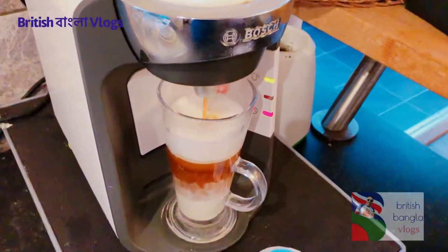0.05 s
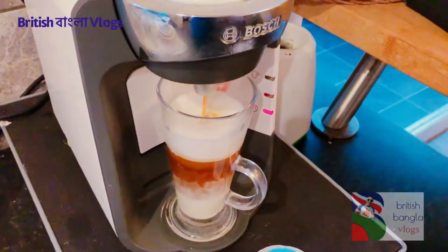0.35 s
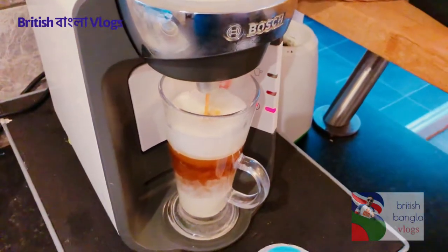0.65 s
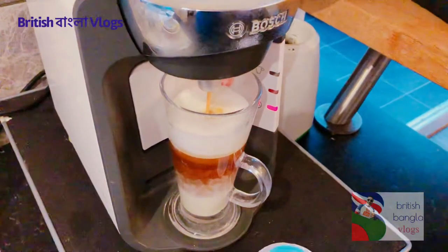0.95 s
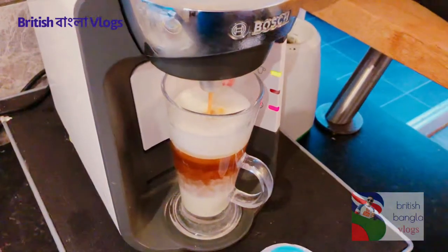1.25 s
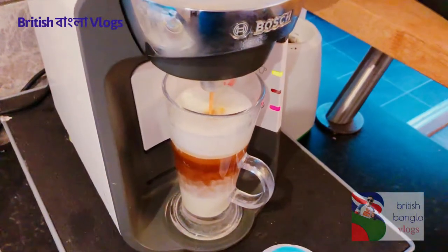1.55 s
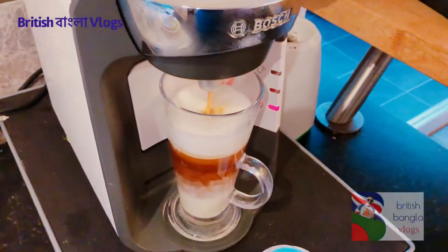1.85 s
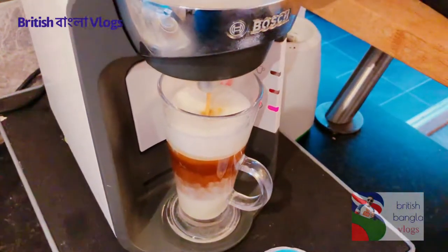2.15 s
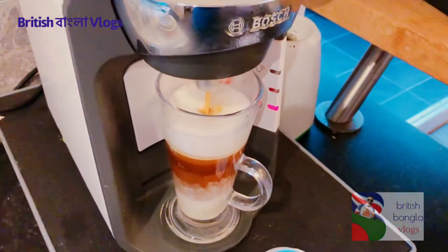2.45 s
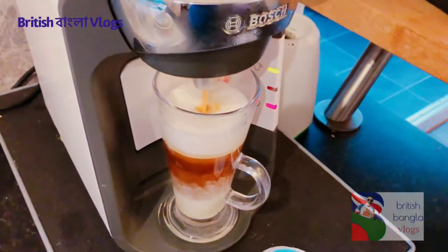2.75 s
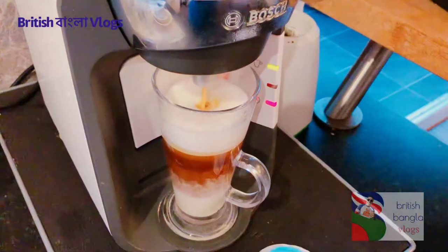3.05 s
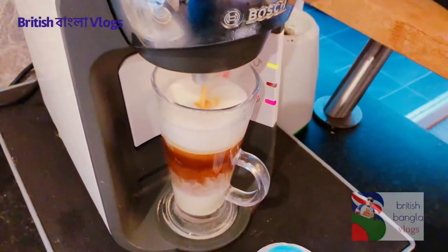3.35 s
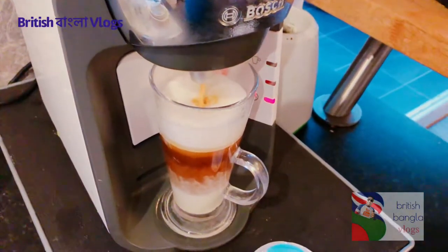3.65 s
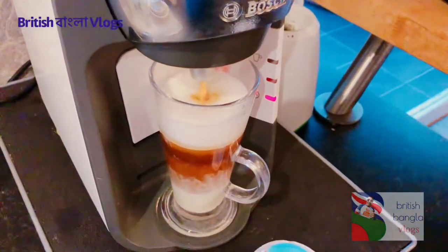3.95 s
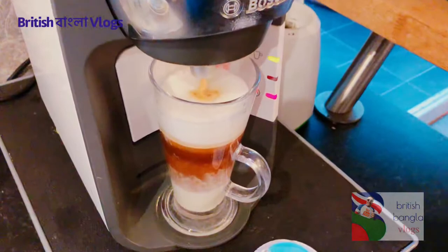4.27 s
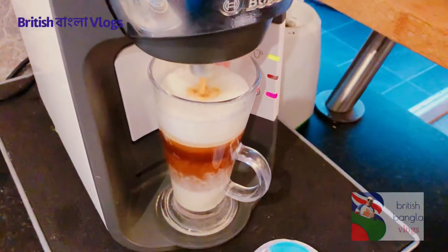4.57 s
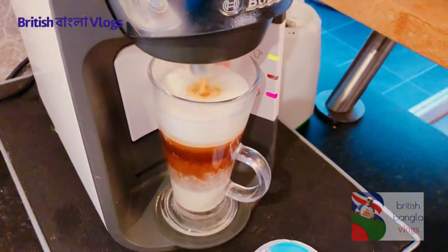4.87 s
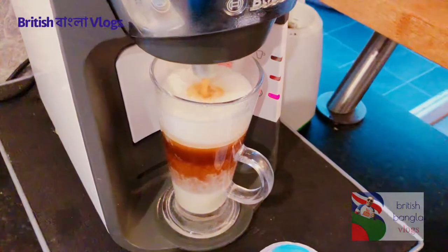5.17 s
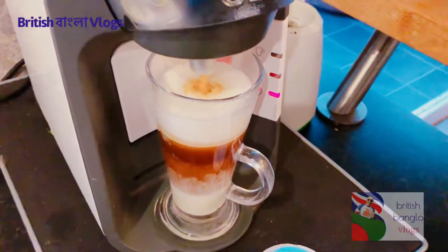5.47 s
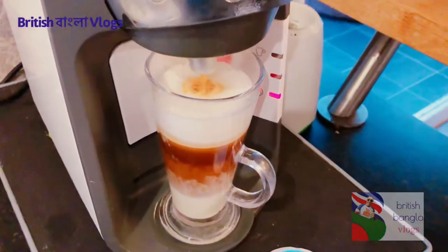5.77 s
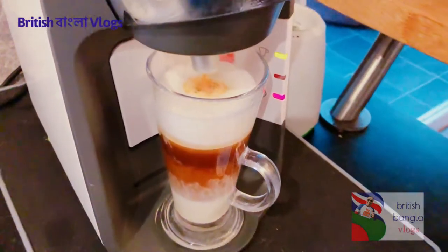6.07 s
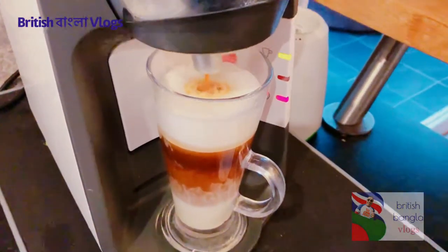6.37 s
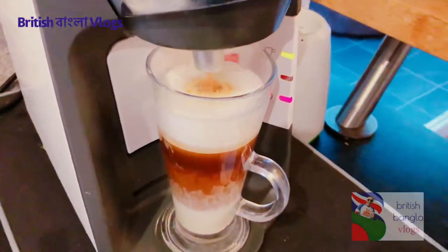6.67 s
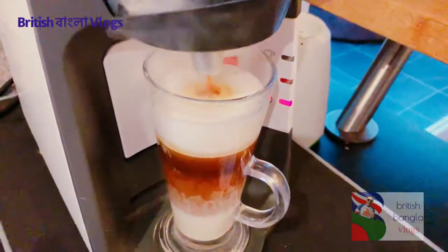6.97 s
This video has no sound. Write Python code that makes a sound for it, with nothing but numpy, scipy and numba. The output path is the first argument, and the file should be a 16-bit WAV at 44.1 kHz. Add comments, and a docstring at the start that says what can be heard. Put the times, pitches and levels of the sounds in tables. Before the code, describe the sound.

Close to the microphone in a small kitchen, steam hisses from the spout of a pod coffee machine, surging and spitting with quick wet pops. After about three seconds the spitting stops and hollow bubbles begin to gulp through the pod, growing louder and denser into a steady gurgle. Froth crackles and thin, high jets sizzle over it toward the end, with a faint electrical hum behind.

```python
"""Steam hisses and spits from the spout of a pod coffee machine, close to a phone in a small kitchen.
Liquid chokes the steam, which tears through in surges. After about three seconds bubbles start to gulp
through the pod and ring its cavity, ever wetter and denser, while froth crackles and fine jets sizzle
in the nozzle. Worktop and walls add a short tail; a faint mains hum lies behind it all."""
import sys
import numpy as np
from scipy import signal
from scipy.fft import rfft, irfft
from scipy.io import wavfile
from scipy.ndimage import uniform_filter1d
from numba import njit

SR = 44100
rng = np.random.default_rng(int(sys.argv[2]) if len(sys.argv) > 2 else 0)


def wav_record(signal):
    """Record a signal, one row per channel, as 16-bit PCM in the file named by sys.argv[1]."""
    frames = np.transpose(np.atleast_2d(signal))
    bounded = np.clip(frames, -1, 1)
    # unit amplitude maps onto the largest positive 16-bit level
    quanta = np.round(bounded * 32767).astype(np.int16)
    wavfile.write(sys.argv[1], SR, quanta)


N = 318402
TIME = np.arange(N) / SR

# Steam pressure behind the spout. Each row: time in seconds, hiss level in dB.
STEAM_LEVEL = [(0, -46.5), (.68, -48.5), (.84, -50), (1.1, -48), (1.4, -49), (2.06, -48), (2.2, -46),
               (2.45, -49.5), (2.85, -49.5), (3.25, -52), (3.6, -51.5), (4.4, -49.5), (5.9, -50.5),
               (6.6, -53.5), (7.22, -54.5)]
# The hiss from close by. Each row: frequency in Hz, level in dB.
STEAM_SPECTRUM = [(100, -4.5), (400, -6), (600, 8.5), (950, -11.5), (1300, -23.5), (2000, -10.5),
                  (2550, -10), (3100, -2), (3550, -1.5), (3900, -2), (4200, -2.5), (4850, -1), (5400, 0),
                  (6500, 2.5), (7700, -4.5), (8800, -9.5), (12000, -17.5)]
# Narrow resonances of the spout. Each row: frequency in Hz, width in Hz, level in dB.
SPOUT_MODES = [(3030, 70, 1), (3420, 120, 2), (3660, 70, 0), (4160, 80, 6.5), (4320, 60, 4), (5180, 55, 2),
               (5430, 60, 4), (5630, 60, -1), (5805, 95, 3), (6150, 55, 0), (6365, 50, 4), (6620, 180, 2.5),
               (7165, 80, 5), (7650, 80, 1), (7980, 90, 3), (8320, 70, 3)]
def steam(level_db=2, flutter_db=2, swell_db=1, droplet_db=-10, split_hz=5400, damped_hz=4750):
    """Turbulent hiss with fine droplets rings the spout; large and small eddies flutter apart."""
    db, = curves(STEAM_LEVEL)
    surge_hiss = undb(-5) * np.minimum(surge(), undb(-49))
    force = np.hypot(undb(db) * throttle(), surge_hiss)
    jet = 0
    for side in ("low", "high"):
        eddies = unit(noise() + undb(droplet_db) * pops(rate=900, spread_db=14))
        unsteady = undb(flutter_db * flutter() + swell_db * walk(24.96))
        jet = jet + butter(eddies * unsteady, split_hz, side, order=4)
    hiss = colour(jet * force * undb(level_db), STEAM_SPECTRUM, SPOUT_MODES)
    # foam fills the spout and damps its middle resonances
    middle = signal.lfilter(*signal.iirpeak(damped_hz, 3, fs=SR), hiss)
    return hiss - np.interp(TIME, [4.9, 6.6], [0, .45]) * middle


# Liquid chokes the spout. Each row: clearing time in seconds, build-up in seconds, depth in dB.
SPOUT_CHOKES = [(.955, 0.34, 2.5), (1.135, 0.17, 7), (1.33, 0.12, 2), (1.57, 0.088, 3.5), (2.355, 0.36, 7),
                (3.85, 0.21, 4)]
def throttle(clear_s=.0033):
    """Share of the steam that gets past the liquid gathering in the spout."""
    return undb(-sum(depth * np.interp(TIME, [s - build, s, s + clear_s], [0, 1, 0])
                     for s, build, depth in SPOUT_CHOKES))


# Surges at the spout. Each row: start in seconds, end in seconds, level in dB.
STEAM_SURGES = [(0, 0.212, -46), (0.506, 0.625, -55.5), (1.183, 1.273, -50), (1.685, 1.7, -59.5),
                (1.923, 1.953, -54)]
def surge(attack_s=.092, release_s=.069):
    """Force of the steam as it tears through liquid."""
    return sum(undb(db) * gate(start, end, attack_s, release_s) for start, end, db in STEAM_SURGES)


# Single spits. Each row: time in seconds, plop level in dB, crack level in dB, length in seconds.
SPOUT_SPITS = [(0.016, -40.5, -50, 0.014), (0.1, -39, -40, 0.016), (0.134, -36, -40.5, 0.01),
               (0.16, -37, -52, 0.0059), (0.236, -39, -52, 0.004), (0.325, -45, -55, 0.0045),
               (0.37, -42, -52, 0.0058), (0.425, -37, -57, 0.012), (0.505, -37.5, -55, 0.0042),
               (0.573, -34.5, -41, 0.012), (0.606, -40.5, -42, 0.0051), (0.641, -40, -57, 0.0041),
               (0.681, -42, -54, 0.0056), (0.953, -68, -47, 0.028), (1.097, -48, -60, 0.004),
               (1.133, -45, -49, 0.0056), (1.169, -33.5, -37.5, 0.012), (1.21, -42, -37.5, 0.0086),
               (1.24, -49, -34, 0.005), (1.246, -33.5, -43, 0.0087), (1.414, -46, -41, 0.009),
               (1.466, -39.5, -45, 0.0078), (1.641, -47, -57, 0.0051), (1.674, -41.5, -43.5, 0.013),
               (1.725, -46, -40, 0.0074), (1.756, -41, -40, 0.008), (1.803, -39, -41, 0.008),
               (1.896, -35.5, -40, 0.017), (1.924, -43, -41, 0.013), (1.952, -46, -45, 0.005),
               (2.013, -43, -45, 0.0066), (2.025, -53, -43.5, 0.018), (2.171, -47, -56, 0.011),
               (2.21, -43, -46, 0.0064), (2.303, -49, -48, 0.005), (2.342, -45, -52, 0.0048),
               (2.36, -39.5, -45, 0.013), (2.424, -44.5, -47, 0.014), (2.523, -56, -48, .004),
               (2.563, -41, -44, 0.0077), (2.627, -43, -42, 0.005), (2.66, -42, -43, 0.01),
               (2.751, -43, -49, 0.0077), (2.798, -38.5, -43, 0.011), (2.83, -42, -43, 0.0092),
               (2.877, -45, -41, 0.0063), (2.903, -45, -40, 0.0046), (2.972, -48, -57, 0.0048),
               (3.108, -48, -41, 0.0044), (3.143, -41, -40, 0.0074), (3.165, -62, -40.5, 0.0089)]
# The wet body of a spit, then its crack. Each row: frequency in Hz, level in dB.
SPIT_SPECTRUM = [(80, -27), (160, -2.5), (260, -1), (420, 0.5), (590, 5.5), (740, -1.5), (850, 7),
                 (1000, -1), (1200, 7), (1380, 4), (1490, -11), (1620, -0.5), (1900, 0.5), (2700, -7.5),
                 (4000, -6), (7000, -26), (10000, -23.5), (16000, -34)]
CRACK_SPECTRUM = [(900, -44), (1800, 4), (4000, 4), (7000, 7.5), (9000, -7.5), (12500, -8), (16000, -23)]
POCKET_HZ, POCKET_SCATTER, POCKET_DRYING_DB_PER_S = 1325, .028, 2.6
def sputter(level_db=-2, lump_db=3, plop_db=-7, crack_db=-2, drying_db_per_s=.5):
    """Slugs of liquid burst into clusters of tiny pops; the largest are spits with a sharp crack."""
    spatter = undb(-60 - drying_db_per_s * TIME) * throttle() + surge()
    lumps = unit(undb(lump_db * flutter()))
    force = spatter * undb(level_db) * lumps * np.interp(TIME, [3.2, 3.5], [1, 0])
    snapping = unit(pops(rate=3000, spread_db=-5.5) + 1.15 * noise())
    burst = np.zeros(N)
    for s, low_db, high_db, length in SPOUT_SPITS:
        age = np.maximum(TIME - s + .0016, 0) / (length / 2)
        swell = age * np.exp(1 - age)
        force = force + undb(low_db + plop_db) * swell
        burst = burst + undb(high_db + crack_db) * swell
    tearing = unit(pops(rate=2700, spread_db=0) + .53 * noise())
    body = colour(force * tearing, SPIT_SPECTRUM)
    # air in the liquid rings, more weakly as the spout dries
    air = ring(force * noise(), POCKET_HZ * np.exp(POCKET_SCATTER * walk(11)), width_hz=100.)
    air *= undb(-14.5 - POCKET_DRYING_DB_PER_S * TIME)
    return body + air + colour(burst * snapping, CRACK_SPECTRUM, SPOUT_MODES)


def pockets(level_db=1, rise_s=.002):
    """Each spit traps a pocket of air that pings as it closes."""
    pitches = POCKET_HZ * np.exp(POCKET_SCATTER * rng.standard_normal(len(SPOUT_SPITS)))
    return blips([(s + length / 4, db + level_db - POCKET_DRYING_DB_PER_S * s, hz, rise_s)
                  for (s, db, _, length), hz in zip(SPOUT_SPITS, pitches)])


# Big bubbles. Each row: time in seconds, level in dB, pitch in Hz, relative snap level in dB.
BIG_BUBBLES = [(3.565, -38.5, 570, -20), (3.621, -44, 592, -13), (3.797, -32.5, 610, -17),
               (3.822, -38, 570, -12), (3.861, -43, 663, -8), (3.884, -36, 555, -16),
               (3.901, -34.5, 616, -12), (3.952, -38, 593, -12), (4.108, -39.5, 585, -18),
               (4.254, -32, 601, -23), (4.27, -34, 602, -14), (4.39, -31.5, 585, -14),
               (4.41, -26.5, 624, -14), (4.5, -32, 580, -18), (4.527, -36.5, 566, -12),
               (4.633, -30.5, 600, -18), (4.68, -36, 598, -15), (4.712, -25.5, 600, -13),
               (4.846, -30, 636, -20), (4.917, -28, 607, -13), (4.943, -29.5, 576, -11),
               (4.99, -29, 634, -17), (5.099, -35, 665, -21), (5.128, -27.5, 660, -15),
               (5.302, -27.5, 650, -16), (5.348, -26.5, 619, -24), (5.471, -27, 545, -22),
               (5.518, -28, 590, -18), (5.566, -31, 646, -8), (5.608, -25, 640, -15),
               (5.66, -26.5, 560, -15), (5.687, -27, 630, -20), (5.771, -26, 649, -11),
               (5.796, -26, 580, -8), (5.818, -23, 602, -12), (5.846, -22.5, 627, -16),
               (5.949, -25, 610, -14), (5.966, -28, 585, -9), (6.008, -26, 703, -13),
               (6.095, -22, 617, -10), (6.136, -27, 672, -5), (6.216, -27.5, 602, -10),
               (6.257, -31, 700, -3), (6.281, -28, 552, -7), (6.343, -23.5, 656, -10),
               (6.405, -31, 646, -5), (6.454, -27.5, 600, -15), (6.522, -29, 694, -11),
               (6.578, -25.5, 711, -10), (6.608, -28.5, 830, -3), (6.637, -32, 743, -5),
               (6.647, -29, 637, -8), (6.885, -27.5, 780, -5), (6.975, -28.5, 716, 0),
               (7.059, -33.5, 670, -7), (7.159, -32, 620, -13)]
def gulps(level_db=-2, rise_s=.0018, ring_s=.0063, ring_db=-18.5):
    """Each big bubble breaks through with a hollow plop at its own pitch, then rings on softly."""
    plop = blips([(s, db, hz, rise_s) for s, db, hz, _ in BIG_BUBBLES])
    after = blips([(s, db + ring_db, hz, ring_s) for s, db, hz, _ in BIG_BUBBLES])
    return undb(level_db) * (plop + after)


def bubbles(count=900, scatter_db=1, uneven=.5):
    """Bubbles let go of the pod as clicks at uneven gaps, faster as the flow grows."""
    pace = np.interp(TIME, [3.3, 6.6], [70, 95])
    gap, sign, size = rng.standard_normal((count, 3)).T
    at = np.searchsorted(np.cumsum(pace) / SR, np.cumsum(np.exp(uneven * gap)))
    clicks = np.zeros(N + 1)
    clicks[at] = np.sign(sign) * undb(scatter_db * np.clip(size, -2, 1))
    return unit(clicks[:N])


# Flow of bubbles through the pod. Each row: time in seconds, level in dB.
BUBBLE_FLOW = [(3.2, -84), (3.28, -55.5), (4.55, -52.5), (4.63, -46), (4.82, -41.5), (5.25, -39.5),
               (5.6, -35.5), (5.83, -36), (6.1, -37.5), (6.5, -38.5), (6.65, -36), (6.8, -36.5), (7, -45),
               (7.22, -37.5)]
# The pod's cavity shrinks a little. Each row: time in seconds, resonance in Hz.
POD_PITCH = [(3.2, 605), (5.4, 609), (6.1, 619), (6.54, 633), (6.58, 786), (6.75, 746), (6.95, 742),
             (7.22, 710)]
# Modes of that cavity. Each row: multiple of its resonance, width in Hz, level in dB.
POD_MODES = [(0.68, 60, -12.5), (1, 124, -0.5)]
def gurgle(released, level_db=-2, fine_db=-2.5, slosh=.025, scatter=.06):
    """Bubbles of changing size, with finer ones between them, set the sloshing cavity ringing."""
    db, = curves(BUBBLE_FLOW)
    hz = curves(POD_PITCH)[0] * np.exp(slosh * walk(35))
    push = (released + undb(fine_db) * pops(rate=700, spread_db=-1)) * outlet_opening()
    swing = ring(push, hz * np.exp(scatter * walk(120)), width_hz=200.)
    cavity = sum(undb(mode_db) * ring(swing, ratio * hz, float(width))
                 for ratio, width, mode_db in POD_MODES)
    stream = unit(butter(cavity, [290, 1000], "band"))
    return stream * undb(db + level_db) * (TIME > BUBBLE_FLOW[0][0])


# The bubbling stalls. Each row: start in seconds, end in seconds; heard only if the end is later.
FLOW_STALLS = [(3.51, 3.47), (3.75, 3.66), (4.145, 4.1), (4.315, 4.42), (4.55, 4.605)]
def outlet_opening(stall_db=-20, blocked_share=.36, growing_s=.0038):
    """Share of the outlet left free by stalls and by each big bubble as it grows."""
    opening = undb(stall_db * sum(gate(start, end, .024, .0017) for start, end in FLOW_STALLS))
    for s, *_ in BIG_BUBBLES:
        opening *= 1 - blocked_share * np.exp(-((TIME - s) / growing_s + .5) ** 2)
    return opening


# Froth builds up in the nozzle and stays. Each row: time in seconds, crackle level in dB.
FROTH_LEVEL = [(3.15, -76), (3.4, -61.5), (4.55, -61.5), (5, -53), (5.8, -45), (6.55, -45), (6.58, -43.5),
               (6.65, -40.5), (6.75, -42.5), (6.86, -43), (6.92, -45), (7.06, -44), (7.22, -39)]
# The froth from close by. Each row: frequency in Hz, level in dB.
FROTH_SPECTRUM = [(60, -5.5), (140, -7.5), (280, -7.5), (420, -1), (820, 3.5), (1030, -2.5), (1200, 4.5),
                  (1550, 6.5), (2000, -3), (2550, -3.5), (3450, -1.5), (4600, -28), (7100, -3),
                  (10000, -40.5)]
# Resonances of the foam-filled nozzle. Each row: frequency in Hz, width in Hz, level in dB.
NOZZLE_MODES = [(1250, 120, -6), (1530, 110, -15), (3510, 150, 2)]
def froth(released, level_db=.78, clump_db=2.4, tick_db=-5, snap_db=14.5, ping_db=-21, waver_db=-28.5):
    """Foam films tear with clicks and a fizz; every bubble bursts with a tick, big ones with a snap."""
    db, = curves(FROTH_LEVEL)
    force = undb(db + level_db) * (TIME > FROTH_LEVEL[0][0])
    tears = unit(pops(rate=1200, spread_db=-1.5) + .6 * noise()) * unit(undb(clump_db * walk(160)))
    crackle = unit(tears + undb(tick_db) * released) * force
    snaps = np.zeros(N)
    for s, gulp_db, _, relative_db in BIG_BUBBLES:
        snaps[int((s - .001) * SR)] = undb(gulp_db + relative_db + snap_db)
    # small bubbles ping, and the nozzle's sharpest ring wavers as foam passes
    pings = ring(force * pops(rate=130, spread_db=5), hz=1430 * np.exp(.12 * walk(150)), width_hz=170.)
    waver = ring(force * noise(), hz=2957 * np.exp(.028 * walk(13)), width_hz=76.)
    snap_tails = .12 * fade(snaps, seconds=.0024) * noise()
    films = colour(crackle + snaps + snap_tails, FROTH_SPECTRUM, NOZZLE_MODES)
    return films + undb(ping_db) * pings + undb(waver_db) * waver


# Large films of froth. Each row: time in seconds, level in dB, band centre in Hz.
FILM_BURSTS = [(3.279, -47, 2300), (4.756, -40, 5292), (4.797, -40, 4460), (5.141, -44, 4000),
               (5.387, -39, 2820), (5.785, -41, 2600), (6.138, -41, 2190), (6.277, -32.5, 2400),
               (6.496, -36, 2000), (7.067, -44, 2410)]
def crackles(hold_s=.00076, attack_s=.00024, decay_s=.0032):
    """Single large films burst with a short, sharp crack."""
    cracks = 0
    for s, db, hz in FILM_BURSTS:
        band = unit(butter(noise(), [hz / 1.65, hz * 1.52], "band"))
        cracks = cracks + undb(db) * gate(s, s + hold_s, attack_s, decay_s) * band
    return cracks


# Jets in the wet nozzle. Each row: start in seconds, end in seconds, sizzle in dB, spray in dB.
THIN_JETS = [(5.21, 5.73, -48.5, -62), (5.453, 5.5, -49, -49), (5.597, 5.62, -44, -45),
             (5.646, 5.684, -41.5, -48), (5.806, 6.43, -43, -42.5), (6.47, 6.548, -46.5, -56),
             (6.797, 7.225, -57.5, -59)]
# The leak, the jets' sizzle and their finest spray. Each row: frequency in Hz, level in dB.
LEAK_SPECTRUM = [(5500, -26.5), (7000, 7), (8200, 0), (9300, -5), (11200, 0), (12200, -17), (16000, -17)]
SIZZLE_SPECTRUM = [(5500, -10.5), (7100, 2.5), (7700, -3), (8400, 7), (8900, -8), (9600, 0), (10200, 9),
                   (10700, -6), (11200, 12.5), (11550, 0), (11950, -23), (16000, -10)]
SPRAY_SPECTRUM = [(8000, -14), (11900, -10), (12700, -2), (14000, -1), (15700, 0), (17000, 0)]
def jets(sizzle_db=-1, flutter_db=1, leak_s=2.6, full_s=5.22, growth_db_per_s=5.5, sag_db_per_s=17):
    """Over a fine, growing leak, thin jets open abruptly and sizzle while their spray weakens."""
    wet = np.clip((TIME - leak_s) / .8, 0, 1)
    leak = wet * undb(-66 + growth_db_per_s * (np.minimum(TIME, full_s) - leak_s))
    sizzle, spray = 0, wet * undb(-59.5)
    for start, end, low_db, high_db in THIN_JETS:
        opened = gate(start, end, attack_s=.011, release_s=.033)
        age = np.maximum(TIME - start, 0)
        sizzle = np.hypot(sizzle, opened * undb(low_db + sizzle_db))
        spray = np.hypot(spray, opened * undb(high_db - sag_db_per_s * age))
    layers = [(leak, LEAK_SPECTRUM), (sizzle, SIZZLE_SPECTRUM), (spray, SPRAY_SPECTRUM)]
    return sum(colour(force * noise() * unit(undb(flutter_db * flutter())), spectrum)
               for force, spectrum in layers)


# Breathy whistles. Each row: start and end in seconds, pitch and width in Hz, level in dB,
# rise and fall time in seconds.
NOZZLE_WHISTLES = [(1.545, 1.654, 5750, 450, -50, .05), (2.43, 2.9, 5550, 700, -58, .05),
                   (5.768, 5.815, 3020, 450, -45, .03), (5.828, 5.903, 7240, 1100, -44, .025),
                   (6.558, 7.22, 15500, 650, -53, .006), (6.56, 7.22, 14800, 700, -56.5, .006),
                   (6.598, 6.678, 10300, 800, -52.5, .01), (6.79, 7.222, 10400, 805, -61, 0.011),
                   (6.558, 7.22, 3680, 450, -59, .02), (6.977, 7.23, 3540, 330, -48, .08)]
def whistles(flutter_db=4):
    """Now and then the steam finds a narrow gap and blows one of the nozzle's resonances."""
    tone = 0
    for start, end, hz, width, db, edge in NOZZLE_WHISTLES:
        blow = np.interp(TIME, [start - edge, start, end, end + edge], [0, 1, 1, 0])
        gap = signal.iirpeak(hz, hz / width, fs=SR)
        breath = unit(signal.lfilter(*gap, signal.lfilter(*gap, noise())))
        tone = tone + blow * undb(db) * breath
    return tone * unit(undb(flutter_db * walk(50)))


def spurts(depth_db=1.8):
    """Passing liquid makes all the jets and whistles pulse together."""
    return unit(undb(depth_db * flutter(rate=90, slowest_hz=12.6)))


def housing(released, level_db=-61.5, hz=128., follow=.52):
    """The bubbles shake the housing, which booms softly with the flow and fades towards the end."""
    flow_db, = curves(BUBBLE_FLOW)
    boom = ring(released + noise(), np.full(N, hz), width_hz=85.)
    boom = unit(butter(boom, [110, 260], "band"))
    ending_db = np.interp(TIME, [6.65, 7], [0, -6])
    return boom * undb(level_db + follow * (flow_db - flow_db.max()) + ending_db)


# Droplets in the spout. Each row: frequency in Hz, level in dB.
DROPLET_SPECTRUM = [(600, 1), (1200, 0), (1900, -5), (2800, -24), (4200, -1), (7000, -9), (12000, -32)]
def droplets(level_db=-67):
    """Stray droplets crackle for as long as the spout sputters, more quietly while it is choked."""
    bursts = fade(np.abs(pops(rate=45, spread_db=5)), seconds=.0039)
    crackle = unit(colour(bursts * noise(), DROPLET_SPECTRUM))
    return crackle * undb(level_db) * throttle() ** 2 * np.interp(TIME, [3.2, 3.5], [1, 0])


def kitchen(x, wet_db=-10, t60_s=.2):
    """Worktop and walls return a short diffuse tail to the microphone."""
    t = TIME[:SR // 2]
    tail = rng.standard_normal(len(t)) * np.exp(-np.log(1000) * t / t60_s) * (t > .004)
    return x + undb(wet_db) * signal.fftconvolve(x, tail / np.linalg.norm(tail))[:N]


# Room tone of the kitchen. Each row: frequency in Hz, level in dB.
ROOM_SPECTRUM = [(20, -37), (42, -10), (70, -4.5), (130, -8), (300, -3), (1000, -35), (8000, -49)]
def background(hum_hz=49, hum_db=-71, room_db=-66, air_db=-67):
    """Mains hum over the low murmur and faint even hiss of the kitchen."""
    hum = np.sqrt(2) * np.sin(2 * np.pi * hum_hz * TIME) * undb(hum_db + .8 * walk(4.1))
    return hum + undb(room_db) * colour(noise(), ROOM_SPECTRUM) + undb(air_db) * noise()


def undb(db):
    """Decibels to gain."""
    return 10 ** (np.asarray(db) / 20)


def unit(x):
    """Scale to rms 1."""
    return x / np.sqrt(np.mean(x ** 2))


def noise():
    """White noise of rms 1."""
    return rng.standard_normal(N)


def butter(x, hz, kind, order=2):
    """Low-, high- or band-pass filter."""
    return signal.sosfilt(signal.butter(order, hz, kind, fs=SR, output="sos"), x)


def curves(table):
    """Each column of a table joined by straight lines in time."""
    s, *columns = np.transpose(table)
    return [np.interp(TIME, s, c) for c in columns]


def gate(start, end, attack_s, release_s):
    """Rise just before the start, hold, then die away after the end."""
    rise = np.clip((TIME - start) / attack_s + 1, 0, 1)
    return rise * np.exp(-np.maximum(TIME - end, 0) / release_s)


def fade(x, seconds):
    """Let every input die away exponentially."""
    return signal.lfilter([1], [1, -np.exp(-1 / (seconds * SR))], x + 1e-18)


def walk(rate):
    """Random levels held 1 / rate s and smoothed twice; rms 1."""
    hold = max(int(SR / rate), 2)
    steps = np.repeat(rng.standard_normal(N // hold + 1), hold)
    return unit(uniform_filter1d(uniform_filter1d(steps, hold), hold)[:N])


def flutter(rate=170, slowest_hz=28):
    """Quick unsteadiness that leaves the mean flow even; rms 1."""
    return unit(butter(walk(rate), slowest_hz, "high"))


def pops(rate, spread_db):
    """Random clicks of uneven size, so many a second; rms 1."""
    hits = rng.random(N) < rate / SR
    size = undb(spread_db * np.clip(noise(), -2, 1.5))
    return unit(hits * size * rng.choice([-1, 1], N))


def blips(rows):
    """Bubble tones that swell and die. Each row: start in seconds, peak in dB, Hz, rise in seconds."""
    tones, t = np.zeros(N + SR), TIME[:SR // 10]
    for s, db, hz, rise in rows:
        at = int(s * SR)
        tones[at:at + len(t)] += undb(db) * t / rise * np.exp(1 - t / rise) * np.sin(2 * np.pi * hz * t)
    return tones[:N]


@njit
def ring(x, hz, width_hz):
    """A moving mode that rings with amplitude 1 after a unit click."""
    y, z, loss = np.empty(len(x)), 0j, np.exp(-np.pi * width_hz / SR)
    for i in range(len(x)):
        z = z * loss * np.exp(2j * np.pi * hz[i] / SR) + x[i]
        y[i] = z.real
    return y


def colour(x, spectrum, modes=(), size=4096):
    """Causal filter of unit power with a given spectrum and narrow resonances on top."""
    f = np.maximum(np.fft.rfftfreq(size, 1 / SR), 1)
    hz, db = np.transpose(spectrum)
    peaks = sum(2 * undb(peak_db) ** 2 / (1 + (2 * (f - centre) / width) ** 2)
                for centre, width, peak_db in modes)
    gain = undb(np.interp(np.log(f), np.log(hz), db)) * np.sqrt(1 + peaks)
    # folding the cepstrum gives minimum phase, so clicks stay sharp
    cepstrum = irfft(np.log(gain))
    cepstrum[1:size // 2] *= 2
    cepstrum[size // 2 + 1:] = 0
    response = irfft(np.exp(rfft(cepstrum)))
    return signal.fftconvolve(x, response / np.linalg.norm(response))[:N]


def scene():
    """The machine in its kitchen, in mono from close by."""
    released = bubbles()
    spitting = steam() + sputter() + pockets() + droplets()
    bubbling = gurgle(released) + gulps() + housing(released) + froth(released) + crackles()
    sizzling = spurts() * (jets() + whistles())
    return (kitchen(spitting + bubbling + sizzling) + background())[None]


def record(dry, bass_hz=38, top_hz=15830):
    """The phone beside the machine drops the deep bass and cuts the top."""
    thin = butter(dry, bass_hz, "high", order=4)
    return signal.sosfilt(signal.ellip(10, .2, 70, top_hz, fs=SR, output="sos"), thin)


dry = scene()
out = record(dry)
wav_record(out)
```